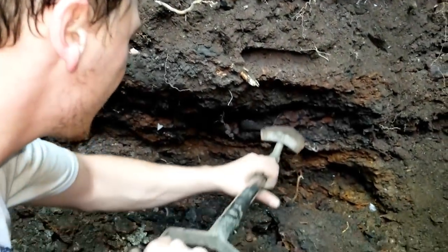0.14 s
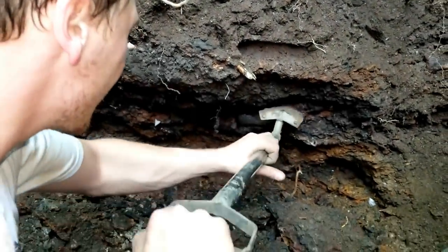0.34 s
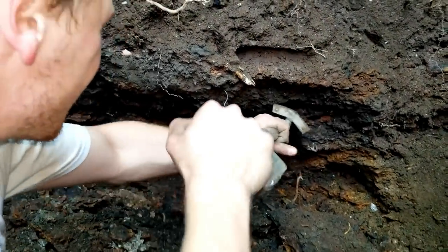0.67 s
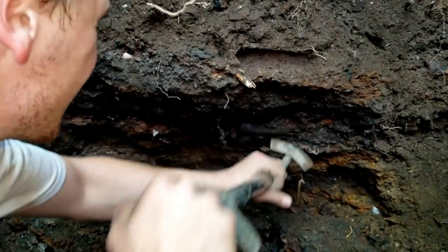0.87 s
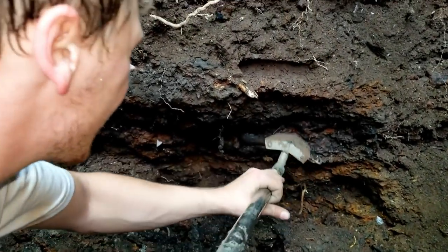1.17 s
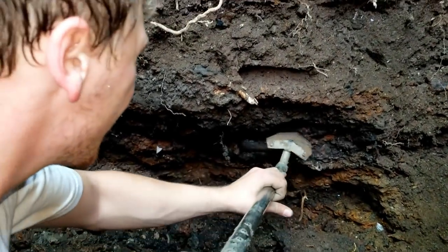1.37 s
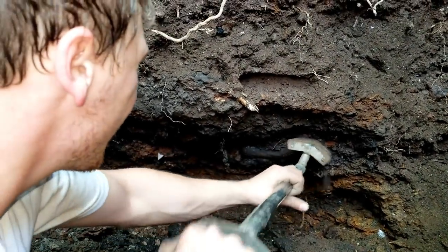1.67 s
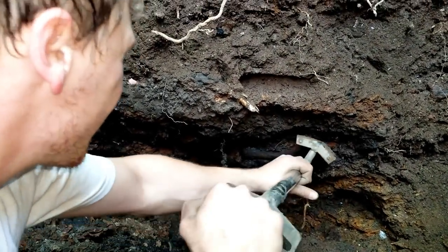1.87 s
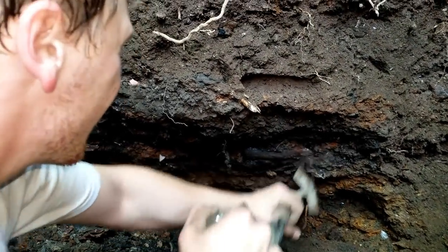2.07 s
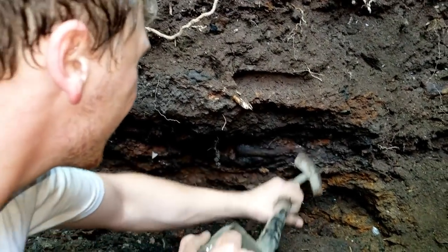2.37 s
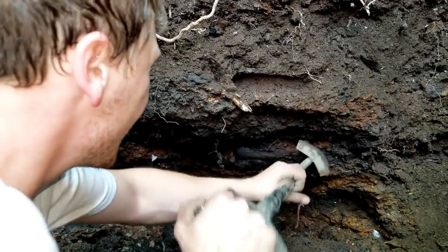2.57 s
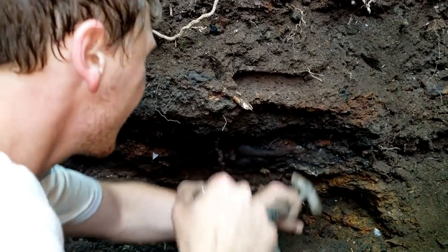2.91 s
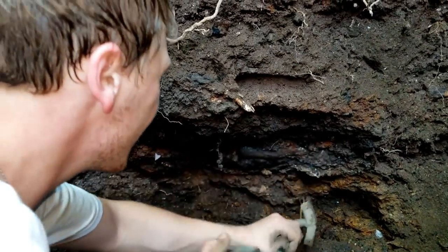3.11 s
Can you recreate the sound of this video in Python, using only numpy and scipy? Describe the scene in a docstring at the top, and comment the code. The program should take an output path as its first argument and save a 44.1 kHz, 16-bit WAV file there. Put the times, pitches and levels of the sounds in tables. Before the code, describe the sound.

A small steel hand tool scrapes packed dirt in quick gritty strokes, heard very close in stereo inside a deep hole; stony clicks, a pause, more scraping, then one low knock and sparse trickling crumbs.

```python
"""Hand tool scraping in a deep hole

A small steel hand tool scrapes and picks at packed dirt, close to two microphone ports. The scrape is grainy noise
in bands that also excites blade resonances; strikes on stony crust are noise cracks with ringing sines and a soil push.
One knock thumps the wall with swelling sines; crumbs are short bright noise ticks, mostly on the right.
The hole answers with decaying noise echoes; low rumble and thin hiss, both shaped noise, lie under all."""
import sys
import numpy as np
from scipy import signal
from scipy.fft import rfft, irfft, next_fast_len
from scipy.io import wavfile
from scipy.ndimage import map_coordinates

SR = 44100
rng = np.random.default_rng(int(sys.argv[2]) if len(sys.argv) > 2 else 0)


def log_audio(samples):
    """Write samples as a 16-bit WAV file to the path given in sys.argv[1]."""
    # one column per channel
    frames = np.atleast_2d(samples).T
    # limit to full scale, then quantise
    limited = np.clip(frames, -1, 1)
    pcm = np.round(limited * 32767).astype(np.int16)
    wavfile.write(sys.argv[1], SR, pcm)


N = 143325  # samples


def amp(db):
    """Amplitude factor of a level in dB."""
    return 10 ** (np.asarray(db) / 20)


def unit(x):
    """x scaled to an RMS of 1."""
    return x / np.sqrt(np.mean(x ** 2) + 1e-20)


def along(points, hz):
    """Interpolates (frequency [Hz], value) points on a log frequency axis."""
    f, v = np.transpose(points)
    return np.interp(np.log(hz + 1), np.log(f + 1), v)


def wobble(rate):
    """A smooth random curve with `rate` knots a second."""
    knots = rng.standard_normal(int(N * rate / SR) + 4)
    return map_coordinates(knots, [np.arange(N) * rate / SR])


def filtered(x, response):
    """Filters x by a gain or complex response given as a function of frequency."""
    m = next_fast_len(x.shape[-1] + 4096)
    spectrum = rfft(x, m) * response(np.fft.rfftfreq(m, 1 / SR))
    return irfft(spectrum, m)[..., :x.shape[-1]]


def band(hz, lo_hz, hi_hz):
    """A band-pass gain that falls 18 dB per octave on either side."""
    return 1 / np.sqrt((1 + (lo_hz / (hz + 1)) ** 6) * (1 + (hz / hi_hz) ** 6))


def resonances(f, modes):
    """Response of causal resonators (centre [Hz], width [Hz], level [dB]) with alternating signs."""
    total = 0
    for k, (centre, width, db) in enumerate(modes):
        damping = 1j * f * width
        total = total + (-1) ** k * amp(db) * damping / (centre * centre - f * f + damping)
    return total


def add(track, s, x):
    """Lays x on the track at time s in seconds."""
    part = track[..., round(s * SR):][..., :x.shape[-1]]
    part += x[..., :part.shape[-1]]


def aside(track, s, x, pan_db):
    """Lays x on both ports with the level and time difference of its place."""
    lag_s_per_db = .00005  # a sound louder at one port reaches it later
    for port, sign in zip(track, (.5, -.5)):
        add(port, s + sign * pan_db * lag_s_per_db, amp(sign * pan_db) * x)


def burst(shape, tilt_db, t60, rise_s):
    """A crack of coloured noise that decays fast, then crumbles softly; peak 1."""
    t = np.arange(SR // 10) / SR
    tail_db, tail_t60 = -20, 0.036  # the softer crumbling
    noise = filtered(rng.standard_normal(len(t)),
                     lambda hz: shape(hz) * amp(tilt_db * np.log2((hz + 50) / 5000)))
    decay = amp(-60 * t / t60) + amp(tail_db - 60 * t / tail_t60)
    crack = noise * decay * (1 - np.exp(-t / rise_s)) ** 2
    return crack / np.abs(crack).max()


def grit_noise():
    """Random grains of uneven strength roughen three noises: one common to the ports, one for each alone."""
    grains_per_s, grain_spread_db, grain_s = 1800, 3.5, .0007
    smooth, lumps_db = .7, 1.4  # steady share against the grains; slow unevenness
    hits = rng.random(N) < grains_per_s / SR
    hits = hits * amp(grain_spread_db * np.minimum(rng.exponential(size=N), 3.5))
    grains = signal.lfilter([1], [1, -np.exp(-1 / (grain_s * SR))], hits)
    return (smooth + unit(grains)) * amp(lumps_db * wobble(90)) * rng.standard_normal((3, N))


def scrape_layers(common, alone):
    """Splits the grit into grit, body and fine dust bands, and adds a resonant thud of the wall."""
    # Grit colour: (frequency [Hz], relative density [dB per Hz])
    grit_colour = [(300, 3.5), (900, -1), (1900, -4), (3900, -1), (7000, -8), (11000, -9), (16000, -7.5)]
    # Stereo width: (frequency [Hz], share of the grit power that each port hears alone [0-1])
    width = [(300, 0.054), (1500, 0.56), (4000, 0.47), (12000, 0.66)]
    own_db = 1  # each band also clumps by itself

    def share(hz):
        return np.clip(along(width, hz), 0, 1)

    wide = filtered(common, lambda hz: np.sqrt(1 - share(hz)))
    wide = wide + filtered(alone, lambda hz: np.sqrt(share(hz)))

    def part(lo_hz, hi_hz):
        clumps = amp(own_db * wobble(44.94))
        return unit(clumps * filtered(wide, lambda hz: amp(along(grit_colour, hz)) * band(hz, lo_hz, hi_hz)))

    wall_modes = [(142.6, 22, 2.5), (230.3, 40, -4)]
    thud = unit(filtered(rng.standard_normal(N), lambda hz: resonances(hz, wall_modes) * band(hz, 80, 246)))
    return [part(1400, 7000), part(300, 1400), thud, part(7000, 20000)]


def blade_ring(common, near_hz):
    """Grit drags over the blade and wakes its resonances, most strongly near one frequency."""
    # Blade resonances: (frequency [Hz], width [Hz], level before the contact's favour [dB])
    blade = [(930, 70, -3), (1090, 70, -1), (1220, 60, -3), (1420, 50, -4), (1590, 45, -4), (2330, 90, -4),
             (2820, 55, -1), (3960, 55, 1), (4820, 120, -5), (7660, 150, -8)]
    favour_db, broken_db = 14, 2  # loss per octave away from near_hz; depth of the ring's breaking up
    modes = [(hz, w, db - favour_db * abs(np.log2(hz / near_hz))) for hz, w, db in blade]
    return unit(amp(broken_db * wobble(40)) * filtered(common, lambda hz: resonances(hz, modes)))


def scraping():
    """Strokes and trickling soil are heard directly, through the blade and through the wall."""
    # One list per stroke, with the soil that trickles after it:
    # (time [s], grit level [dB], body [dB over the grit], thud [dB over the grit], fine dust [dB over the grit])
    strokes = [
        [(0.03, -79.5, 10, -4, 8), (0.064, -79.5, 1, -7, 11.5), (0.072, -76, -6, -15, 0.5),
         (0.12, -67.5, -19, -2, 1), (0.13, -77.5, -10, -1, 15.5), (0.14, -69.5, -5, 2, -29.5)],
        [(0.18, -60, 8, -8, -13), (0.214, -56.5, -10, -11, 0.5), (0.288, -76.5, 2, 9.5, -5),
         (0.302, -40, -10.5, -12.5, -1), (0.366, -63.5, -3.5, 5.5, 0), (0.44, -62, -17, -5.5, -2.5)],
        [(0.44, -62, -7, -14, -1.5), (0.462, -47, -13, -10, -3.5), (0.485, -47, 0, -10, -7),
         (0.492, -39.5, -7, -15, -6.5), (0.505, -39, -5.5, -11.5, -8.5), (0.554, -70, 1.5, 13.5, -4),
         (0.566, -58.5, -3, -14, 9.5), (0.6, -53.5, -12, 4, -6)],
        [(0.6, -54, -1.5, 2.5, 4.5), (0.634, -44.5, -11.5, -14, -9.5), (0.654, -47.5, -7, -6, -1),
         (0.694, -40, -9.5, -7.5, -5), (0.71, -54.5, -7, -3, -10.5), (0.745, -64.5, -4, -5, -2),
         (0.757, -53.5, -15, -13, -6), (0.775, -61.5, -2, -5, -5), (0.8, -62.5, -5, -12, -5)],
        [(0.8, -67, -5, -11, 2), (0.835, -62.5, 0, 0, 1.5), (0.848, -61.5, 3.5, 1, 3.5),
         (0.875, -59.5, 0.5, -1.5, 1), (0.93, -66.5, -3, -4, -2.5), (1.01, -69.5, -2.5, -13, 3),
         (1.08, -84, 5, 21, 13.5), (1.12, -91, -1, -1, 0)],
        [(1.5, -76, -13, -1, 1.5), (1.524, -66.5, -31.5, -14, 4.5), (1.536, -43.5, -12.5, -21, -3.5),
         (1.556, -45.5, -5.5, -3.5, 2.5), (1.575, -51.5, 1.5, -8, 1), (1.595, -55, -2, -2, -1),
         (1.607, -48.5, -6, -4, -3), (1.62, -56.5, 0, -3, -5), (1.66, -53, -2.5, -5, 1),
         (1.7, -56.5, -2, 1, 6.5)],
        [(1.7, -52, 1, 1, 1), (1.716, -51.5, -1.5, -10, 3.5), (1.748, -39.5, -2.5, 1.5, -0.5),
         (1.757, -44, -6, -1, -5.5), (1.765, -40.5, -8, -5.5, -4), (1.784, -43, -9, 4.5, -4.5),
         (1.796, -63.5, 3, 4.5, 3), (1.96, -78.5, 6, 10, 11.5)],
        [(1.96, -80.5, -4, 13, 8.5), (2.022, -56, 2, 1.5, 7), (2.046, -67.5, -5, -7, -5),
         (2.128, -79.5, -11, 10, 13), (2.2, -88, 8, 11, -8), (2.23, -74, 9.5, 12, 2), (2.27, -74.5, 9.5, 1, 10)],
        [(2.522, -85.5, 0, 10, 3.95), (2.53, -65.5, -1, 10, 5), (2.54, -48, -3, 13, 6),
         (2.546, -46.5, 1, 18.7, 3)],
        [(2.6, -70, 6, 26, 0.5), (2.646, -71, 2.5, 2.3, 12.5), (2.674, -72, -2, 13, 7),
         (2.684, -74.5, -6, 2, 15), (2.712, -77, -5, 6.8, 1), (2.8, -76.5, -12, 6.6, 4)],
        [(2.8, -73, -18, -2, 8), (2.83, -71, -10, -5, 6), (2.843, -63, -3, -9, 2.5),
         (2.862, -75, -5.5, -3, 5.4), (3.172, -78.5, -22.5, 11, 1.1), (3.23, -84.5, -17, -7, 15),
         (3.25, -77.5, -4, 15, 4)],
    ]
    # Blade contact per stroke: (favoured frequency [Hz], ring where the grit is 4 dB below its top [dB over the grit])
    sings = [(2330, -11), (2330, -7), (1060, 0), (3300, -2.5), (2820, -11), (2330, -6), (2820, -2),
             (1400, -9), (2330, -14), (2330, -14), (3960, -5)]
    ring_grows = .4  # extra dB of ring per dB of grit: the ring fades faster than the grit
    t = np.arange(N) / SR
    common, *alone = grit_noise()
    layers = scrape_layers(common, np.array(alone))
    out = np.zeros((2, N))
    for rows, (near_hz, ring_db) in zip(strokes, sings):
        s, level, *over = np.transpose(rows)
        ring = blade_ring(common, near_hz)
        ring_db = ring_db + ring_grows * (level - level.max() + 4)
        # neighbouring strokes crossfade over 8 ms
        fade = np.interp(t, [s[0] - .004, s[0] + .004, s[-1] - .004, s[-1] + .004], [0, 1, 1, 0])
        for offset_db, layer in zip([0] + over + [ring_db], layers + [ring]):
            out += fade * amp(np.interp(t, s, level + offset_db)) * layer
    return out


def strikes():
    """Each blade contact cracks, rings the stony crust as decaying sines and pushes the soil as low noise."""
    # Blade on stone: (time [s], crack peak [dB], ring [dB over the crack], brightness [dB per octave],
    # push [dB over the crack], left minus right [dB])
    contacts = [(0.1484, -14, -5, 1.5, -28.5, -0.5), (0.168, -24, 7.5, -3, -10, -0.5),
                (0.3017, -31.5, -2, 1.5, -16, -1), (0.459, -34.5, 4, -6, -18, 3),
                (0.4887, -28, 3, 3.5, -33, 4), (0.628, -28.5, 0, 1, -23, 2.5),
                (0.6906, -28, -29, -2, -29.5, 4.5), (1.537, -32, -19, -4.5, -35.5, 4),
                (1.602, -30, -26, -3.5, -17, 4), (1.8279, -37.5, -13, -2, -2.5, 3.5),
                (2.2145, -52, -5, -6, 0, 0), (2.229, -50, -5, -6, 0.5, -1.5),
                (2.5422, -28, -37, -5.5, -6.5, 1)]
    # Ringing crust: (frequency [Hz], level over the ring setting [dB], decay by 60 dB [s])
    stone = [(390, -14, 0.03), (1097, -6, 0.035), (1640, -10, 0.015), (1987, -3.5, 0.015),
             (2606, -7.5, 0.013), (3700, -19.5, 0.0072), (3950, -21, 0.037), (4975, -3, 0.011),
             (5890, -14, 0.011)]
    crack_t60, rise_s, push_t60 = 0.018, 0.0016, 0.034
    out, t = np.zeros((2, N)), np.arange(SR // 10) / SR
    for s, db, ring_db, tilt_db, push_db, pan_db in contacts:
        ring = 0
        for hz, level, t60 in stone:
            decay = amp(level + rng.normal(0, 0.67) - 60 * t / t60)
            ring = ring + decay * np.sin(2 * np.pi * (hz * t + rng.random()))
        ring = (1 - np.exp(-t / rise_s)) * amp(ring_db) * ring
        soil = unit(filtered(rng.standard_normal(len(t)), lambda hz: band(hz, 150, 370)))
        push = amp(push_db - 60 * t / push_t60) * soil
        crack = burst(lambda hz: band(hz, 1150, 30000), tilt_db, crack_t60, rise_s)
        aside(out, s - .0005, amp(db) * (crack + ring), pan_db)
        add(out, s + 0.0018, amp(db) * push[None])
    return out


def knock():
    """One blow makes the wall modes swell and die at their own pace; loose soil rattles after."""
    # Knocked wall and handle: (frequency [Hz], envelope peak [dB], delay [s], time to the peak [s])
    wall = [(150, -16.2, .0037, .0072), (207, -25.5, -.0009, .0066), (233, -26.7, .0055, .0074),
            (218, -49, .0135, .018), (310, -39, .004, .007), (430, -37, .0033, .004),
            (640, -37, .0012, .003), (1058, -23.5, .0013, .0014)]
    knock_s = 2.5432
    debris_db, debris_t60 = -30.5, 0.094  # loose soil shaken off by the blow
    out, t = np.zeros(N), np.arange(SR // 4) / SR
    for hz, db, delay_s, peak_s in wall:
        swell = t / peak_s * np.exp(1 - t / peak_s)
        add(out, knock_s + delay_s, amp(db) * swell * np.sin(2 * np.pi * hz * t))
    debris = burst(lambda hz: band(hz, 210, 4500), -7.0, debris_t60, 0.0018)
    add(out, knock_s + 0.0013, amp(debris_db) * debris)
    return out


def placed_tool(x):
    """Places scrape and knock by a level difference per frequency and a delay between the ports."""
    # Tool position: (frequency [Hz], left minus right [dB])
    pan = [(300, 0.6), (700, 1.5), (1500, 1.6), (6000, 1.5), (12000, -1)]
    lag_s = .0001  # later at the left port
    sides = np.array([[.5], [-.5]])
    return filtered(x, lambda hz: amp(sides * along(pan, hz)) * np.exp(-2j * np.pi * hz * sides * lag_s))


def crumbs():
    """Falling soil lands as small bright ticks of noise."""
    # Falling crumbs: (time [s], peak [dB], brightness [dB per octave], left minus right [dB])
    falls = [(0.0358, -45.0, 5, -1), (0.0727, -47.5, -5, -2), (0.1256, -46.5, 9.5, -6.5),
             (0.2236, -34, -2.5, -2.5), (0.2713, -38.5, -1, 0), (0.3787, -47, 4.5, -8),
             (0.3908, -43, -1, -7.5), (0.4234, -41.5, -4, -0.5), (0.5697, -32.5, -1, -3),
             (0.755, -37, -4.5, 5.5), (0.8703, -48, -1.5, -3), (0.986, -60, -6, -3),
             (1.0225, -47.5, 6, -4.5), (1.064, -48.5, 5, -4.5), (1.0765, -51, 9, -1.5),
             (1.0864, -37.5, 6.5, -10.5), (1.268, -41, 1, -4), (1.29, -49.5, 1.5, 2.5),
             (1.2981, -46.5, 0.5, -5.5), (1.481, -46, 19, 3.5), (1.4906, -39.5, 6, -5),
             (1.6525, -21.5, 6.5, -2.5), (1.9918, -37, 8.5, -3.5), (2.2144, -48, 5, 2),
             (2.2889, -30, -1, -9), (2.395, -43.5, 6.5, -5.5), (2.6173, -42.5, 0.5, -1),
             (2.6473, -42, 5, 0), (2.6847, -42.5, 2, -3.5), (2.8064, -49, -2, -2), (2.8085, -30, 4.5, -5),
             (2.8246, -35.5, 3.5, -3.5), (2.9125, -40.5, 8, -14), (2.9856, -55.5, 5, 1),
             (3.0063, -44.5, 1.5, -4), (3.2331, -49.5, 2, -1.5)]
    # Tick colour before the brightness tilt: (frequency [Hz], relative density [dB per Hz])
    colour = [(410, -45), (700, -26), (2150, -12), (3040, -12), (4640, -5.5), (10400, -9.5), (12300, 0),
              (13800, -6.5), (15200, -4), (16500, -23.5)]
    t60, rise_s = 0.0066, 0.00065
    out = np.zeros((2, N))
    for s, db, tilt_db, pan_db in falls:
        tick = burst(lambda hz: amp(along(colour, hz)), tilt_db, t60, rise_s)
        aside(out, s, amp(db) * tick, pan_db)
    return out


def pit(x):
    """Each port hears its own short answer from the hole, a decaying noise echo."""
    hole_db, hole_t60 = -5.5, 0.019
    t = np.arange(SR // 8) / SR
    tail = rng.standard_normal((2, len(t))) * amp(-60 * t / hole_t60) * (t > .001)
    wet = signal.fftconvolve(x, tail / np.linalg.norm(tail[0]), axes=1)[:, :N]
    return x + amp(hole_db) * filtered(wet, lambda hz: band(hz, 870, 9000))


def floor():
    """Low rumble, near mono, and a thin wide hiss: shaped noise mixed from mid and side."""
    # Rumble and hiss colour: (frequency [Hz], relative density [dB per Hz])
    rumble = [(20, -7.5), (30, -2.5), (44, 3.5), (60, -4.5), (90, -7.5), (130, -14), (200, -25.5),
              (260, -19), (330, -28), (700, -32.5), (1300, -42.5), (2500, -45), (4200, -43), (8000, -45.5),
              (13000, -40.5), (16000, -36)]
    # Stereo likeness: (frequency [Hz], left-right correlation [0-1])
    alike = [(30, 1), (150, 0.88), (400, 0.33), (1000, 0.39), (2500, 0.11), (8000, .05)]
    floor_db, drift_db = -55, 1.2

    def mid_side(hz):
        turn = np.arccos(np.clip(along(alike, hz), -1, 1)) / 2
        return amp(along(rumble, hz)) * np.array([np.cos(turn), np.sin(turn)])

    mid, side = filtered(rng.standard_normal((2, N)), mid_side)
    return amp(floor_db + drift_db * wobble(11)) * unit(np.array([mid + side, mid - side]))


def scene():
    """Tool, strikes and crumbs sound in the pit, over the floor."""
    tool = placed_tool(scraping() + knock())
    return pit(tool + strikes() + crumbs()) + floor()


def record(dry):
    """The microphones keep nothing above their band limit."""
    top_hz = 15800
    return filtered(dry, lambda hz: hz < top_hz)


dry = scene()
out = record(dry)
log_audio(out)
```